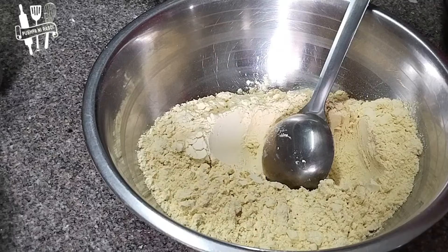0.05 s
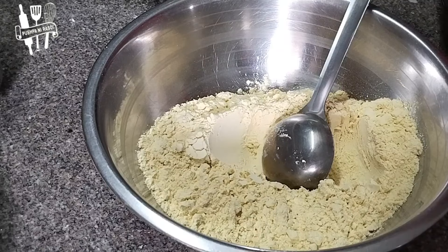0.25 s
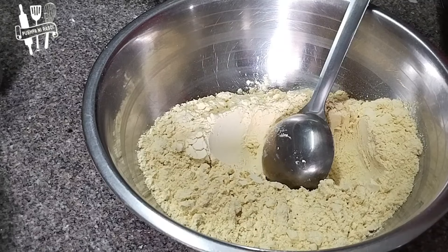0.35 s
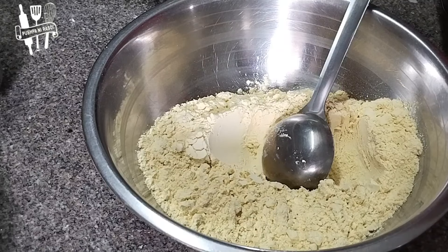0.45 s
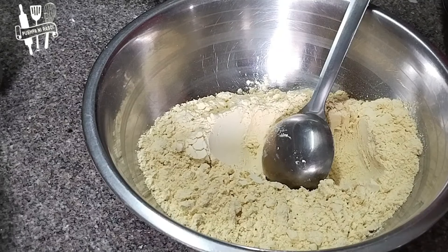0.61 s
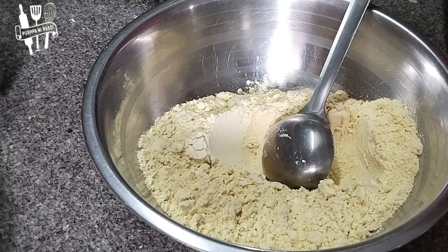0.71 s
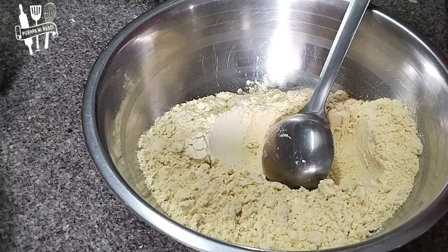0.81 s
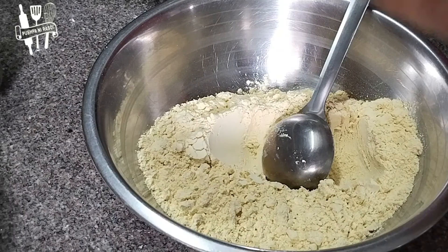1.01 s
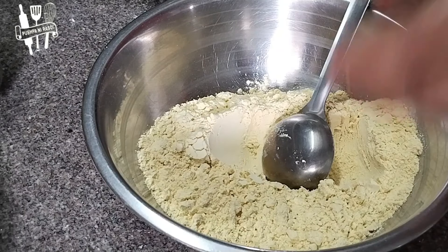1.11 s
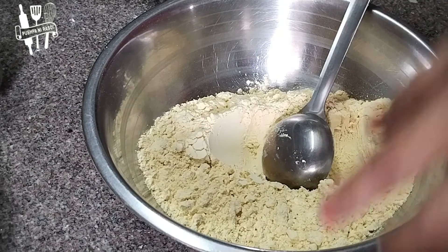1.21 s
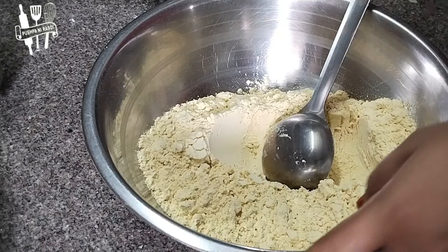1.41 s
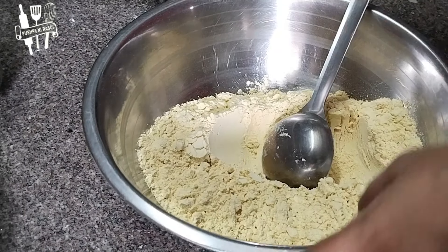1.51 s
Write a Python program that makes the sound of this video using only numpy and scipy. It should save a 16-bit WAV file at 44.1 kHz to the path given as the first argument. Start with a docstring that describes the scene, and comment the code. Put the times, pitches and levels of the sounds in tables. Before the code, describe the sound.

A steel spoon clanks sharply on a metal bowl, clanks again duller, then ticks, knocks lightly and scrapes briefly; a hand rustles faintly at the end. Close microphone, quiet reverberant kitchen with low hum.

```python
"""Over a low steady noise, a loud clank opens a second and a half of steel spoon and bowls in a quiet kitchen.
A second clank, a bright tick, light knocks and a short scrape follow; a hand rustles at the bowl.
Contacts are impulses and chattering noise, filtered and rung by steel modes, with decaying-noise reverberation.
Scrape: random slips. Rustle: grainy noise. Boom: a decaying sine. Kitchen: shaped noise and a wavering hum."""
import sys
import numpy as np
from scipy import signal
from scipy.fft import rfft, irfft, next_fast_len
from scipy.io import wavfile

SR = 44100
rng = np.random.default_rng(int(sys.argv[2]) if len(sys.argv) > 2 else 0)


def transcribe(signal):
    """Save signal, clipped to [-1, 1], as a 16-bit WAV file at the path in sys.argv[1]."""
    frames = np.atleast_2d(signal).T
    limited = np.clip(frames, -1, 1)
    pcm = np.round(limited * 32767).astype(np.int16)
    wavfile.write(sys.argv[1], SR, pcm)


N = 68355
T = np.arange(N) / SR   # [s]

# Contacts: (time [s], place, level [dB], bass [dB], presence [dB], treble [dB], crack [dB], room [dB], ring [dB])
# Crack and room are relative to the chatter; ring is relative to the level.
CONTACTS = [(0.2468, "rim", -25, -2, -1.5, -1.5, -0.5, -9, -17),
            (0.2779, "rim", -30.5, -11.5, -14.5, -5, 7.5, -6, -37),
            (0.3546, "rim", -64, -16, -5.5, -9, -17, 8.5, -17),
            (0.4551, "spoon", -52, -11, 13, 18, -17, -25, -24),
            (0.4585, "base", -30, -0.5, -9, -2, -23, -5.5, -13),
            (0.4711, "base", -36, 3, -8, 1.5, 6.5, -7.5, -46),
            (0.75, "spoon", -49, -12, -3.5, 18, -2, -8.5, -15.5),
            (0.8640, "wall", -47, 9.5, -2, 5, -13, -6.5, -20.5),
            (0.8865, "wall", -51.5, 3.5, -16, 0, 8, -38, -29),
            (0.9192, "wall", -43, 7.5, -6, 3.5, -4, -10, -17.5),
            (0.9680, "wall", -50, 9.5, 0.5, 6, -12, -6.5, -22),
            (0.9785, "wall", -47.5, 12.5, -17, -12, 8, -18, -50),
            (1.1360, "wall", -56, 7, 0.5, -8, -7, -9, -23),
            (1.1994, "tip", -66.5, 0, -11, 14.5, 8, -8, -38),
            (1.4871, "edge", -71.5, 21, -14.5, 12.5, 17.5, -3, -22.5)]
# Centres of bass, middle, presence and treble: [Hz]
TONE_HZ = [350, 950, 2300, 9000]
# Broad spectrum of a contact: (frequency [Hz], relative density [dB per Hz])
CONTACT_COLOUR = [(40, -41), (130, -15.5), (225, -14.5), (280, 0.5), (500, 2), (750, 3), (1100, 0),
                  (1400, 4.5), (2000, 5.5), (2700, -3.5), (3300, -0.5), (4100, -13), (4800, -7.5),
                  (6200, -10.5), (6800, -18), (8000, -20.5), (9300, -20), (11000, -22), (12500, -31),
                  (15000, -30.5)]
# Steel resonances by place of contact: (frequency [Hz], height over the broad colour [dB])
STEEL_MODES = { "rim": [(355, -3), (795, 1), (1220, 5), (1620, 10), (1925, 8), (2430, 7.5), (2590, 4.5),
               (2670, 11), (4710, 2.5), (5780, 2.5), (5965, 5), (6135, 10), (6355, 9), (8880, 2.5)],
               "base": [(325, 0.5), (468, 1), (605, 0.5), (925, 5.5), (992, 7), (1332, 6), (1660, 2.5),
               (1935, 0.5), (3270, -6), (3400, 2.5), (4050, 11), (4720, -5), (5300, 9), (7050, 11.5)],
               "spoon": [(824, 12), (952, 12), (1354, 8), (2205, 7.5), (2277, 10.5), (3090, 16.5),
               (3426, 7.5), (4137, 16), (5400, -5), (6160, -4), (7800, 11), (4620, 0), (11100, -2.5)],
               "wall": [(285, 5), (590, 10.5), (650, 7), (800, 15), (1050, 12.5), (1385, 5.5), (2240, 4),
               (2550, 10), (2930, 10.5), (4600, 8)], "edge": [(1200, 22.5), (1330, 14), (2420, 16),
               (4100, 31), (4500, 15), (5800, 7)], "tip": [(6900, 13), (10600, 19.5), (11900, 24),
               (12500, 14), (13200, 21), (14100, 15), (15000, 12)]}
MODE_WIDTH_HZ, MODE_WIDTH_SHARE = 35, 0.0024   # width grows with pitch
OVERTONE_SPACING_HZ, OVERTONES_FROM_HZ, OVERTONE_RMS_DB = 70, 3500, 4.4
# Ringing time of the steel modes: (frequency [Hz], T60 [s])
RING_T60 = [(400, 0.29), (1800, 0.16), (6000, 0.06), (11000, 0.11)]
# Contact-force shape (the force's envelope is its square root): hold, time for the shape to fall 60 dB, rise
# constant
CHATTER_HOLD_S, CHATTER_T60_S, CHATTER_RISE_S = 0.006, 0.025, 0.00054
# Reverberation of the room: (frequency [Hz], T60 [s])
ROOM_T60 = [(100, .9), (300, 0.82), (700, 0.75), (1800, .48), (4500, 0.42), (9000, 0.45), (15000, 0.5)]
ROOM_BUILD_S, TAIL_SIDE_DB = 0.0064, -37.5   # tails and steady sounds are narrower than the attacks
# Scrape envelope: (time [s], level [dB])
SCRAPE_LEVEL = [(.72, -115), (.8, -65.5), (.88, -54.5), (.95, -56), (.985, -55.5), (1.03, -54), (1.09, -56),
                (1.16, -57.5), (1.23, -63), (1.3, -112)]
# Scrape spectrum: (frequency [Hz], relative density [dB per Hz])
SCRAPE_COLOUR = [(60, -17.5), (220, -4.5), (285, 10.5), (420, -0.5), (600, 6.5), (730, -8.5), (800, -7),
                 (880, 1), (1050, -3.5), (1180, -6.5), (2300, -11.5), (2900, -9), (3900, -16.5),
                 (5500, -15.5), (9000, -29), (15000, -50)]
SLIPS_PER_S, SLIP_SPREAD_DB = 3000, 3
SCRAPE_ROOM_DB, SCRAPE_T60_SHARE = -2.5, 0.88   # T60 as a share of the room table
# Rustle envelope: (time [s], level [dB])
RUSTLE_LEVEL = [(0, -86.5), (.08, -87.5), (.14, -102), (1.1, -85), (1.17, -73.5), (1.3, -89.5), (1.39, -80),
                (1.45, -72.5), (1.5, -72.5), (1.55, -69)]
# Rustle spectrum: (frequency [Hz], relative density [dB per Hz])
RUSTLE_COLOUR = [(300, 4), (1300, -2), (1800, -8), (2900, -24.5), (3600, 11), (4600, -1), (7600, -8),
                 (8600, 12.5), (10500, 2), (12500, -15.5), (15000, -8)]
# Blows that wake the room's lowest resonance: (time [s], level before the swell envelope [dB])
BOOMS = [(0.247, -36), (0.865, -51.5)]
BOOM_HZ, BOOM_RISE_S, BOOM_T60_S = 114.4, 0.063, 0.71
# Steady-noise spectrum: (frequency [Hz], relative density [dB per Hz])
FLOOR_COLOUR = [(20, -12), (45, -28), (80, 0), (110, 5.5), (160, -2.5), (230, -7.5), (330, -5), (600, -7.5),
                (900, -9.5), (1200, -30.5), (2200, -40.5), (6000, -51.5), (15000, -61.5)]
# Slow level change of noise and hum, with a brief dip: (time [s], level [dB])
FLOOR_SWELL = [(0, 3), (1.22, -2), (1.33, -5), (1.42, 0), (1.55, 2)]
FLOOR_DB, HUM_HZ, HUM_DB, HUM_WAVER_DB = -60, 111.6, -62.5, 4   # levels before the swell
# Stereo spread: (frequency [Hz], gain of the side signal [dB])
WIDTH = [(3600, -55), (4300, -18), (4800, -3), (9000, -3), (15000, -2)]
CUTOFF_HZ = 15700


def from_db(db):
    """Decibels to amplitude gain."""
    return 10 ** (np.asarray(db) / 20)


def rms_one(x):
    """Scale to rms 1."""
    return x / np.sqrt(np.mean(x ** 2) + 1e-20)


def at_hz(points, hz):
    """Interpolate a table on a log-frequency axis."""
    f, value = np.transpose(points)
    return np.interp(np.log(hz + 0.00105), np.log(f), value)


def level(rows):
    """Gain over time from (time [s], level [dB])."""
    return from_db(np.interp(T, *np.transpose(rows)))


def colour(x, points, keep_power=True):
    """Causal minimum-phase filter, built by folding the cepstrum of the gain."""
    size = 2 * next_fast_len(N)
    hz = np.arange(size // 2 + 1) * SR / size
    gain = from_db(at_hz(points, hz))
    if keep_power:
        gain = rms_one(gain)
    cepstrum = irfft(np.log(gain))
    n = np.arange(size)
    fold = 1 + np.sign(size // 2 - n) - (n == 0)
    response = np.exp(rfft(cepstrum * fold))
    return irfft(rfft(x, size) * response)[..., :N]


def dying(t60_s):
    """Exponential decay from 1, down 60 dB after t60_s."""
    return np.exp(-np.log(1000) * T / max(t60_s, 1e-3))


def delayed(x, start_s):
    """Start a sound at start_s."""
    return np.pad(x, ((0, 0), (int(start_s * SR), 0)))[:, :N]


def narrowed(x):
    """Turn down the side of a mid-and-side pair."""
    return x * from_db([[0], [TAIL_SIDE_DB]])


def knocks():
    """Each contact: a crack, chatter, ringing steel and the room's answer."""
    out = np.zeros((2, N))
    for place, modes in STEEL_MODES.items():
        blows = np.zeros((2, N))
        ring = steel_ring(modes)
        for row in CONTACTS:
            if row[1] != place:
                continue
            time_s, _, db, bass_db, presence_db, treble_db, crack_db, room_db, ring_db = row
            hit = chatter() + from_db(room_db) * narrowed(room_tail())
            # at 0 dB the one-sample crack has the energy of 1 ms of rms-1 noise
            hit[0, 0] += from_db(crack_db) * np.sqrt(SR / 1000)
            tone = list(zip(TONE_HZ, (bass_db, 0, presence_db, treble_db)))
            blows += delayed(from_db(db) * colour(hit, tone, keep_power=False), time_s)
            out += delayed(from_db(db + ring_db) * ring, time_s)
        shaped = colour(blows, CONTACT_COLOUR)
        out += colour(shaped, steel_response(modes), keep_power=False)
    return out


def chatter(size=2048, count=6):
    """Steel chatters on steel, then settles: brief random force, nearly flat in spectrum; mid and side."""
    t = T[:size]
    fall_db = -60 * np.maximum(t - CHATTER_HOLD_S, 0) / CHATTER_T60_S
    shape = (1 - np.exp(-t / CHATTER_RISE_S)) * from_db(fall_db)
    force = rng.standard_normal((2, size)) * shape
    for _ in range(count):   # alternately flatten the spectrum and shape in time
        flat = irfft(np.exp(1j * np.angle(rfft(force))))
        force = flat * np.sqrt(shape)
    force = rms_one(force) * np.sqrt(np.mean(shape ** 2))
    return np.pad(force, ((0, 0), (0, N - size)))


def steel_response(modes):
    """Steel filter (frequency [Hz], gain [dB]): main modes and a thicket of irregular treble overtones."""
    hz = np.arange(4, SR / 2, 4)
    peaks = 0   # added power
    for f, db in modes:
        width_hz = MODE_WIDTH_HZ + MODE_WIDTH_SHARE * f
        peaks = peaks + (from_db(db) ** 2 - 1) / (1 + ((hz - f) / width_hz) ** 2) ** 2
    grid = np.arange(0, SR / 2, OVERTONE_SPACING_HZ)
    thicket = np.interp(hz, grid, rms_one(rng.random(len(grid)) - .5))
    thicket = thicket * np.minimum(1, hz / OVERTONES_FROM_HZ) ** 2
    gain_db = 10 * np.log10(np.maximum(1 + peaks, .1)) + OVERTONE_RMS_DB * thicket
    return np.column_stack([hz, gain_db])


def steel_ring(modes):
    """The main modes ring on as sines, each dying at its own rate; mid only."""
    tones = np.zeros(N)
    for hz, db in modes:
        tone = np.sin(2 * np.pi * hz * T + rng.uniform(0, 2 * np.pi))
        tones += from_db(db + at_hz(CONTACT_COLOUR, hz)) * tone * dying(at_hz(RING_T60, hz))
    return tones * [[1], [0]]


def room_tail(t60_share=1):
    """Diffuse reverberation, mid and side: noise whose octave bands die at their own rates."""
    noise = rfft(rng.standard_normal((2, N)))
    hz = np.arange(N // 2 + 1) * SR / N
    edges = np.append(0, SR / 2 / 2. ** np.arange(8)[::-1])
    tail = np.zeros((2, N))
    for low, high in zip(edges, edges[1:]):
        band = irfft(noise * ((hz > low) & (hz <= high)), N)
        tail += band * dying(t60_share * at_hz(ROOM_T60, (low + high) / 2))
    return tail * (1 - np.exp(-T / ROOM_BUILD_S))


def scrape():
    """Steel drags briefly; the slips sound through the bowl and the room."""
    direct = slips() * level(SCRAPE_LEVEL)
    tail = room_tail(SCRAPE_T60_SHARE)
    tail = tail / np.sqrt(np.sum(tail[0] ** 2))
    wet = signal.fftconvolve(direct[:1], tail, axes=1)[:, :N]
    return colour(direct + from_db(SCRAPE_ROOM_DB) * wet, SCRAPE_COLOUR)


def slips():
    """Friction as dense clicks of random time, size and sign; mid and side."""
    sizes = from_db(SLIP_SPREAD_DB * np.minimum(rng.exponential(1, (2, N)), 4))
    signs = rng.choice([-1, 1], (2, N))
    return rms_one(sizes * signs * (rng.random((2, N)) < SLIPS_PER_S / SR))


def rustle(grain_db=-4):
    """The hand moves and takes hold of the bowl: soft hiss with grains of friction."""
    grainy = rng.standard_normal((2, N)) + from_db(grain_db) * slips()
    return colour(grainy, RUSTLE_COLOUR) * level(RUSTLE_LEVEL)


def boom():
    """The room's lowest resonance swells after a blow and fades slowly; mid only."""
    envelope = (1 - np.exp(-T / BOOM_RISE_S)) * dying(BOOM_T60_S)
    swell = envelope * np.sin(2 * np.pi * BOOM_HZ * T) * [[1], [0]]
    return sum(from_db(db) * delayed(swell, time_s) for time_s, db in BOOMS)


def kitchen(count=14):
    """Low shaped noise and a hum that wavers in level and phase."""
    waver = np.interp(T, np.linspace(0, T[-1], count), rng.standard_normal(count))
    hum_gain = from_db(HUM_DB + HUM_WAVER_DB * np.tanh(waver))
    hum = hum_gain * np.sin(2 * np.pi * HUM_HZ * T + waver) * [[1], [0]]
    noise = from_db(FLOOR_DB) * colour(rng.standard_normal((2, N)), FLOOR_COLOUR)
    return level(FLOOR_SWELL) * (noise + hum)


def scene():
    """Sum all sources; only the treble spreads to the sides."""
    mid, side = knocks() + narrowed(scrape() + rustle() + kitchen()) + boom()
    side = colour(side, WIDTH, keep_power=False)
    return np.array([mid + side, mid - side])


def record(dry):
    """Cut the top steeply with an elliptic low-pass."""
    lowpass = signal.ellip(12, .1, 80, CUTOFF_HZ, fs=SR, output="sos")
    return signal.sosfilt(lowpass, dry)


dry = scene()
out = record(dry)
transcribe(out)
```